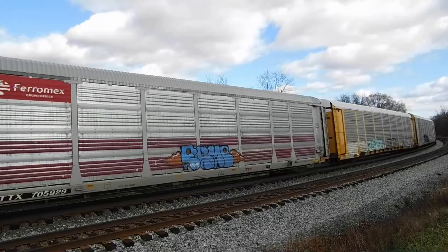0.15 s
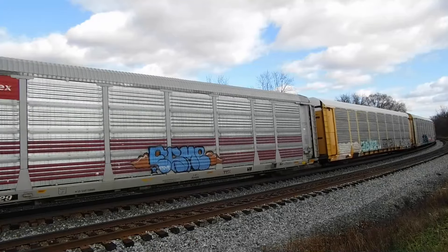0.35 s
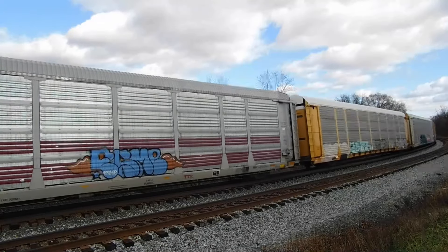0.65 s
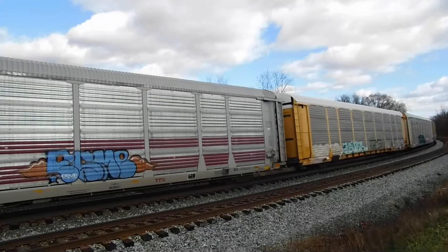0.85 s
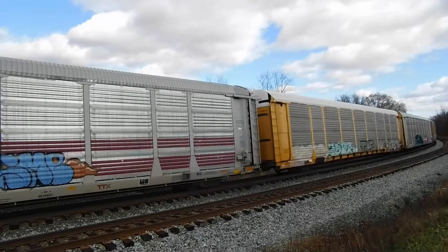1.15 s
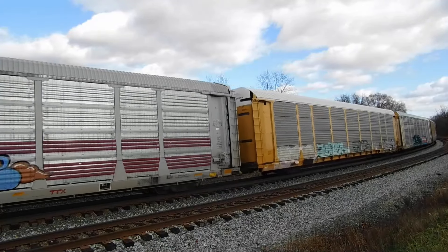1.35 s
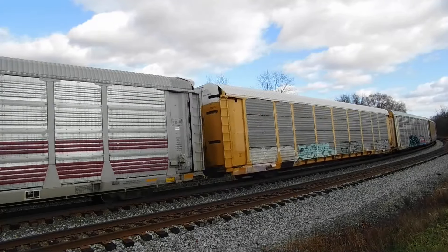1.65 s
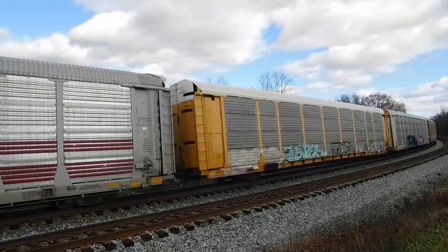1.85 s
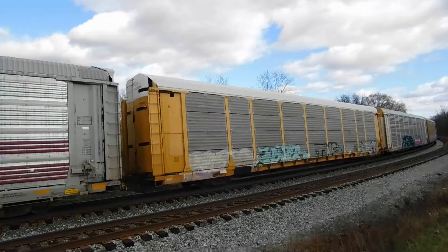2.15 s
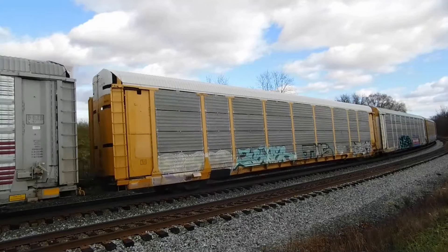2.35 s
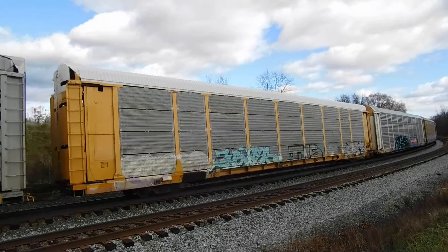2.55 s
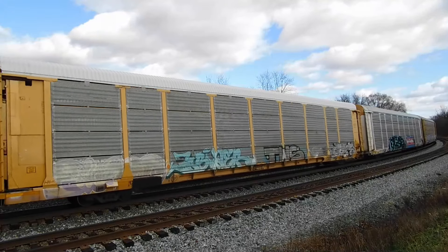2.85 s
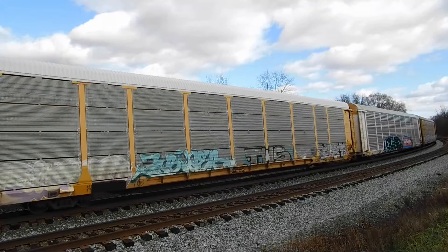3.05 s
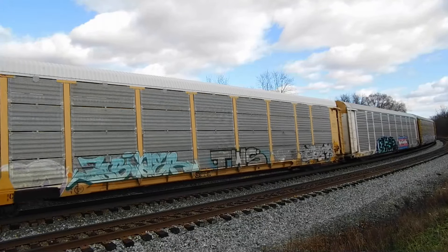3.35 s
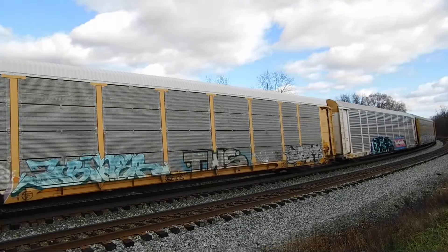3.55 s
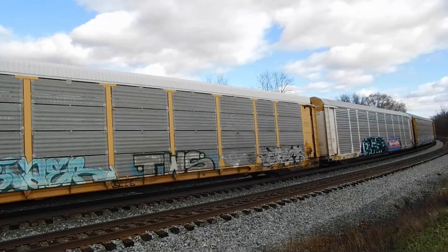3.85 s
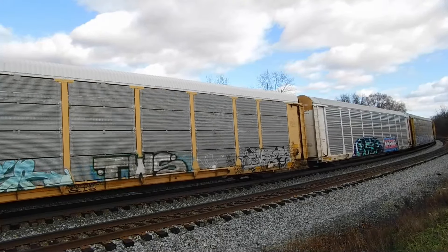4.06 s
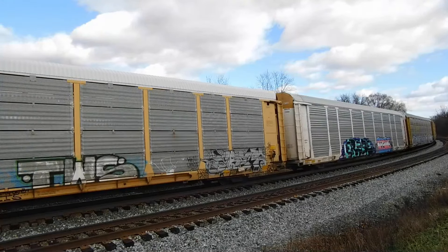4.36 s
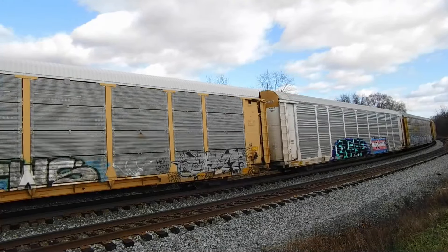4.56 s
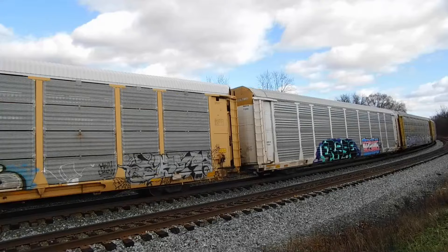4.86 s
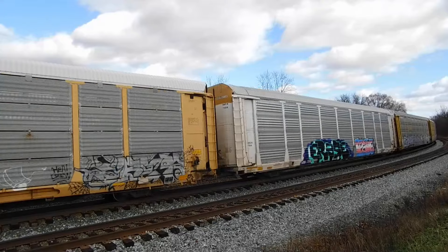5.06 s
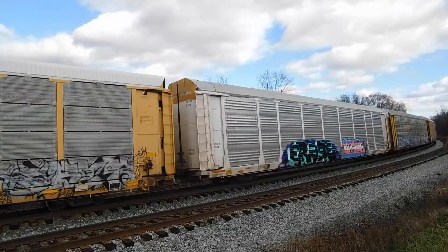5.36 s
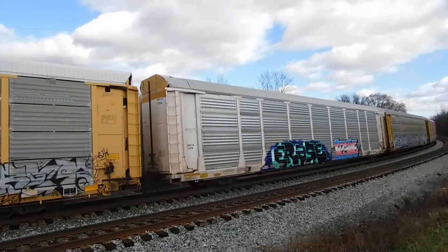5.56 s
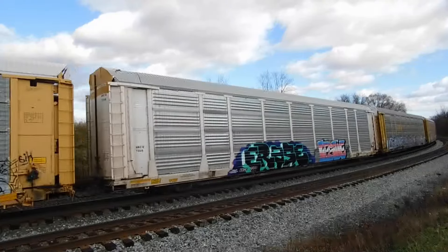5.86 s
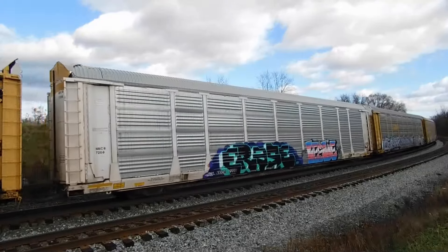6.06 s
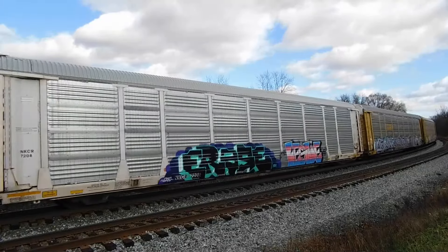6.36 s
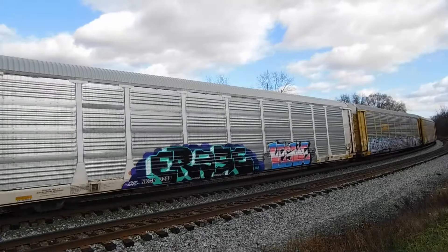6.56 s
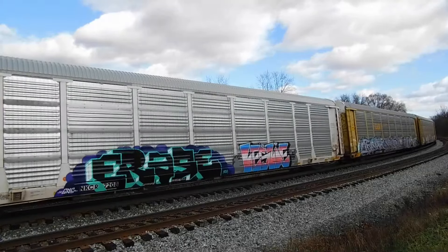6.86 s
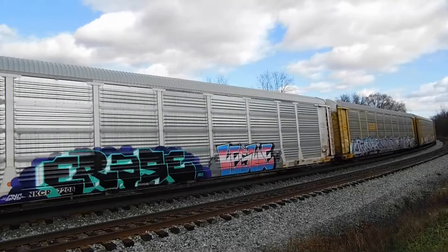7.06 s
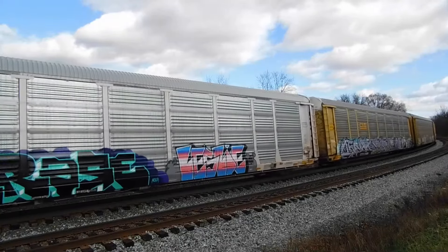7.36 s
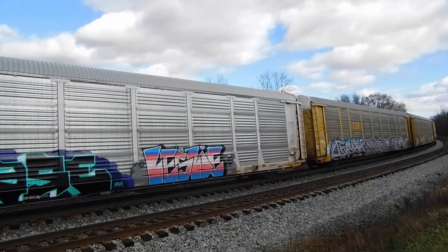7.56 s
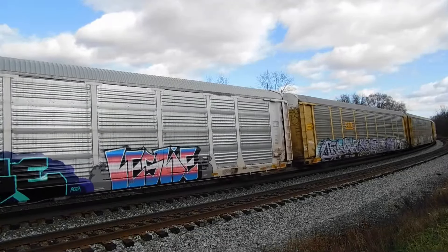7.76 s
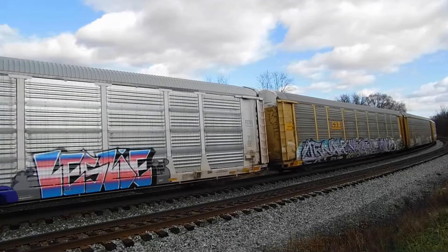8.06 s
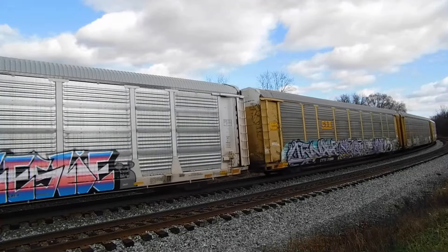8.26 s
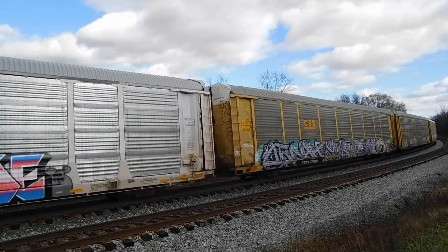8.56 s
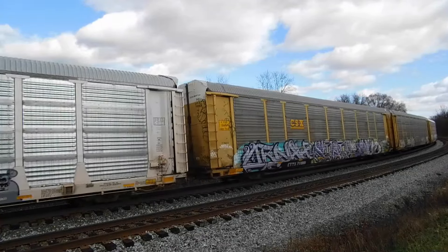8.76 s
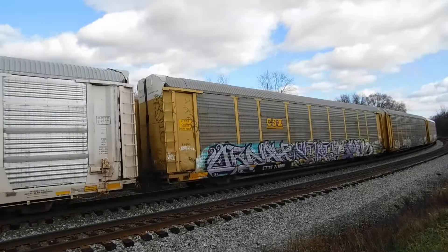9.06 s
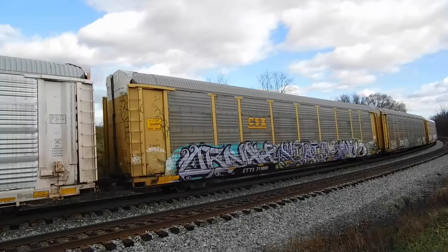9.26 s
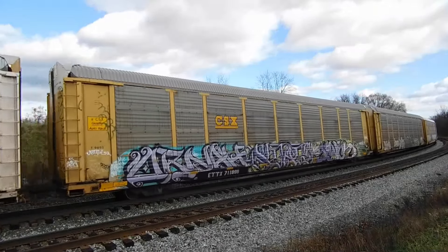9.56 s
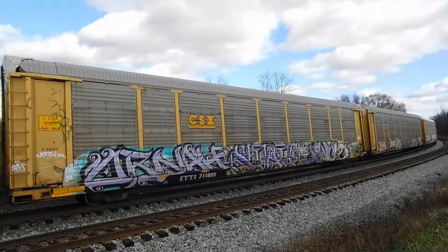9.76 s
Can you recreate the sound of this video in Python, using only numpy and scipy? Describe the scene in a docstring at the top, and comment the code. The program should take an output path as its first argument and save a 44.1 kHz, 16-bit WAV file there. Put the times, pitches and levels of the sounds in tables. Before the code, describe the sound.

A freight train is already passing on a curve outdoors, heard in stereo from about twelve metres. At 0 s a shrill wheel squeal near 2.5 kHz sputters, then grows from 0.5 s into strong, overlapping screeches, fluttering with brief dropouts and echoes. Through about 6 s it dominates, clipping the recorder with harsh buzzing overtones while level control pulls everything down. Its pitch glides slightly lower around 3 s as it passes. Below it, a broad steel roar peaks near 3 s, and low wind gusts buffet from 1 to 4.5 s. Other wheels sing unsteadily, low and mid pitched. Dull clanks knock at 4.2, 4.65 and 5.4 s. Rapid squeal spurts crackle around 6.4-6.7 s as a fainter second squeal enters, fading by about 8 s. Weaker screeches return at 7.4-8.4 and 9-9.6 s with thin scraping, then rolling continues to the 10 s end.

```python
"""Beside a curved railway track, about 12 m off: a freight train of tall car carriers rolls by.
One wheel squeals on a single mode and sinks in pitch as it passes; its sound also scatters off the cars.
Under it: rolling noise, a fainter second squeal, singing wheels, scrapes, clanks and wind.
The sum overloads the recorder: clipping adds harsh overtones, level control turns everything down."""
import sys
import numpy as np
from scipy import signal
from scipy.io import wavfile
from scipy.ndimage import uniform_filter1d

SR = 44100
rng = np.random.default_rng(int(sys.argv[2]) if len(sys.argv) > 2 else 0)


def unload_wav(signal):
    """Save mono or channel-first audio to the path in sys.argv[1] as 16-bit WAV at rate SR, clipped to [-1, 1]."""
    wavfile.write(
        sys.argv[1],
        SR,
        np.round(np.clip(np.atleast_2d(signal).T, -1, 1) * 32767).astype(np.int16),
    )


N = 437022
TIME = np.arange(N) / SR   # s
SIDES = np.array([[1], [-1]])   # left, right


def from_db(db):
    """Decibels to amplitude gain."""
    return 10 ** (np.asarray(db) / 20)


def rms_one(x):
    """Scale to unit power."""
    return x / np.sqrt(np.mean(np.abs(x) ** 2) + 1e-20)


def in_time(rows):
    """Each column of a curve, joined by straight lines."""
    s, *columns = np.transpose(rows)
    return [np.interp(TIME, s, column) for column in columns]


def at_hz(points, hz):
    """Read a spectrum on a log-frequency axis."""
    point_hz, value = np.array(points).T
    return np.interp(np.log(hz), np.log(point_hz), value)


def bump(s, half_s):
    """Bell of height 1 centred on time s, down to 1/e at half_s."""
    return np.exp(-np.minimum(((TIME - s) / half_s) ** 2, 20))


def gate(start_s, end_s, attack_s, release_s):
    """Linear attack, hold, release; half open at start and end."""
    opening = (TIME - start_s) / attack_s
    closing = (end_s - TIME) / release_s
    return np.clip(.5 + np.minimum(opening, closing), 0, 1)


def tone(hz):
    """Complex unit tone following the pitch curve hz."""
    return np.exp(2j * np.pi * np.cumsum(hz) / SR)


def flutter(width_hz, order=2):
    """Complex noise within width_hz of zero, unit power: a random wobble of level and phase."""
    step, run_in = 20, 4000   # made at SR / step, filter start-up dropped
    white = rng.standard_normal((2, N // step + run_in + 2))
    low = signal.butter(order, width_hz, fs=SR / step, output="sos")
    slow = rms_one(signal.sosfilt(low, white[0] + 1j * white[1])[run_in:])
    return np.interp(np.arange(N) / step, np.arange(len(slow)), slow)


def flutter_pair(width_hz):
    """Independent flutter for left and right."""
    return np.array([flutter(width_hz), flutter(width_hz)])


def banded_noise(colour, likeness, patchy_db, patchy_hz, count):
    """Half-octave bands of stereo noise, each with its own level, flicker and likeness; rms 1."""
    edges_hz = 16 * 2 ** (np.arange(count + 1) / 2)
    white = rng.standard_normal((2, 2, N))
    together = flutter(patchy_hz).real   # flicker common to all bands
    out = 0
    for k, (low_hz, high_hz) in enumerate(zip(edges_hz, edges_hz[1:])):
        band = signal.butter(2, [low_hz, high_hz], "band", fs=SR, output="sos")
        mid, side = signal.sosfilt(band, white[k % 2])
        centre_hz = np.sqrt(low_hz * high_hz)
        alike = np.clip(at_hz(likeness, centre_hz), -1, 1)
        flicker_db = patchy_db * (together + flutter(patchy_hz).real)
        gain = from_db(at_hz(colour, centre_hz) + flicker_db)
        out = out + gain * (np.sqrt(1 + alike) * mid + np.sqrt(1 - alike) * side * SIDES)
    return rms_one(out)


def even_hiss(level_db=-57):
    """Faint steady white noise, independent on each side."""
    return from_db(level_db) * rng.standard_normal((2, N))


# wind spectrum: (frequency [Hz], relative density [dB per Hz])
WIND_COLOUR = [(20, -8.5), (45, 3), (80, -4.5), (150, -6), (300, -16.5), (800, -61), (3000, -86)]
# gusts: (peak time [s], half length [s], level [dB])
GUSTS = [(0.098, 0.27, -41), (0.67, 0.14, -33.5), (1.325, 0.4, -23), (2.223, 0.24, -19.5),
         (3.125, 0.75, -21.5), (3.418, 0.096, -19), (3.757, 0.13, -22.5), (4.53, 0.41, -26.5),
         (5.7, 0.71, -31)]


def wind(breeze_db=-61, left_db=2.5):
    """Lumpy eddies at the microphone ports, partly separate on each side; gusts ride on a light breeze."""
    likeness = [(20, 0.59), (300, 0.05)]   # (frequency [Hz], left-right likeness [-1 to 1])
    eddies = banded_noise(WIND_COLOUR, likeness, patchy_db=1.0, patchy_hz=21, count=12)
    gusts = sum(from_db(db) * bump(s, half_s) for s, half_s, db in GUSTS)
    return (from_db(breeze_db) + gusts) * eddies * from_db(left_db * SIDES)


# all wheels rolling on the rails, before trim: (time [s], level [dB])
ROLLING = [(0, -29.5), (1.8, -23), (2.7, -21.5), (3, -18), (3.7, -20.5), (4.3, -21.5), (5.7, -24.5),
           (7, -26), (8.1, -28), (8.5, -24.5), (9.9, -23)]
# rolling spectrum: (frequency [Hz], relative density [dB per Hz])
ROLLING_COLOUR = [(30, -13.5), (60, -9), (150, -10), (220, -11), (440, -2.5), (700, -0.5), (1100, -5.5),
                  (1550, -2.5), (2200, -13), (3400, -15.5), (5200, -28.5), (9000, -27), (11500, -59),
                  (15500, -36)]
# left-right likeness of rolling: (frequency [Hz], likeness [-1 to 1])
ROLLING_LIKENESS = [(60, 1), (290, 0.99), (640, 0.87), (1410, 0.45), (3100, -0.57), (6800, -0.084),
                    (15000, -0.69)]


def rolling(trim_db=-0.5, left_db=0.55):
    """Rough steel on steel: a broad, slightly uneven roar."""
    roar = banded_noise(ROLLING_COLOUR, ROLLING_LIKENESS, patchy_db=1.26, patchy_hz=17.0, count=20)
    return from_db(in_time(ROLLING)[0] + trim_db) * roar * from_db(left_db * SIDES)


# flanges scraping the rail: (start [s], end [s], low edge [Hz], high edge [Hz], level [dB])
SCRAPES = [(0.265, 0.295, 3300, 4700, -38), (8.296, 9.07, 2830, 4600, -42), (8.85, 8.89, 5000, 13000, -50),
           (9.37, 9.456, 6000, 14000, -48), (9.64, 9.727, 8500, 9800, -50)]


def scraping_flanges(fade_share=0.32):
    """Steel rubs without ringing: a band of hiss that swells and fades."""
    out = np.zeros((2, N))
    for start_s, end_s, low_hz, high_hz, db in SCRAPES:
        top_hz = np.clip(high_hz, 1.05 * low_hz, .45 * SR)
        band = signal.butter(2, [low_hz, top_hz], "band", fs=SR, output="sos")
        hiss = rms_one(signal.sosfilt(band, rng.standard_normal((2, N))))
        fade_s = fade_share * (end_s - start_s)
        out += from_db(db) * gate(start_s, end_s, fade_s, fade_s) * hiss
    return out


# thin tones that ring unsteadily, mostly other wheels singing as their flanges rub; the 1442 Hz row at 4.1-5.1
# s is a thin tone near 1.44 kHz under the squeal: (start [s], end [s], frequency [Hz], level [dB])
SINGING = [(-.1, 0.538, 1517, -36.5), (0.597, 0.987, 1486, -34.5), (1.59, 2.157, 612, -33.5),
           (2.59, 2.893, 1507, -34), (3.583, 4.015, 603.3, -24), (4.125, 5.103, 1442, -34),
           (4.2, 4.984, 607.5, -32), (6.18, 6.26, 6960, -30), (6.497, 8.106, 1488, -43),
           (8.598, 10.0, 1515, -40.5)]


def singing_wheels(fade_s=0.034, width_hz=20, unsteady=0.61):
    """Thin tones that ring unsteadily, mostly rubbed wheel modes that do not lock into a squeal."""
    out = np.zeros(N)
    for start_s, end_s, hz, db in SINGING:
        swell = 1 + unsteady * flutter(width_hz)
        pitch_hz = hz + width_hz / 2 * flutter(width_hz).real
        mode = rms_one((swell * tone(pitch_hz)).real)
        out += from_db(db) * gate(start_s, end_s, fade_s, fade_s) * mode
    return out


# couplers and running gear: (time [s], level [dB], 60 dB decay [s], upper band edge [Hz])
CLANKS = [(4.225, -22, 0.26, 700), (4.279, -19.5, 0.33, 910), (4.65, -23, 0.26, 900),
          (5.408, -16, 0.34, 1880), (5.438, -20.5, 0.71, 1360)]


def clanks(low_hz=400):
    """A knock sets the crowded modes of a car body ringing: decaying band noise."""
    out = np.zeros((2, N))
    for s, db, t60_s, bright_hz in CLANKS:
        top_hz = np.clip(bright_hz, 2 * low_hz, SR / 3)
        band = signal.butter(2, [low_hz, top_hz], "band", fs=SR, output="sos")
        knock = (TIME >= s) * from_db(-60 * np.clip((TIME - s) / t60_s, 0, 2))
        white = rng.standard_normal(N) + .5 * rng.standard_normal((2, N))   # shared + separate
        out += from_db(db) * knock * rms_one(signal.sosfilt(band, white))
    return out


# faint second squeal: (start [s], end [s], fundamental [Hz])
SECOND_WHEEL = (6.4, 7.5, 2480)
# its harmonics, lowest first: level [dB]
SECOND_WHEEL_DB = [-24.5, -42, -47.5, -58, -54, -61]


def second_wheel(attack_s=0.22, release_s=1.2, waver_hz=12, width_hz=90):
    """Another wheel squeals faintly, with thin, wavering overtones, and dies away."""
    start_s, end_s, hz = SECOND_WHEEL
    fundamental = tone(hz + waver_hz * flutter(waver_hz).real)
    harmonics = 0
    for k, db in enumerate(SECOND_WHEEL_DB, 1):
        harmonics = harmonics + from_db(db) * flutter_pair(width_hz) * fundamental ** k
    return gate(start_s, end_s, attack_s, release_s) * harmonics.real


WHEEL_HZ = 2486   # squeal pitch without Doppler


def passing_wheel(speed_m_s=8.3, nearest_s=3.2, nearest_m=12.0):
    """Steady pass in a straight line: Doppler pitch [Hz] and 1/distance gain, 1 at the nearest point."""
    along_m = speed_m_s * (TIME - nearest_s)
    distance_m = np.hypot(along_m, nearest_m)
    pitch_hz = WHEEL_HZ / (1 + speed_m_s / 343 * along_m / distance_m)   # sound at 343 m/s
    return pitch_hz, nearest_m / distance_m


# the flange bites and the ring swells: (start [s], end [s], level [dB])
BITES = [(-.1, 0.504, -7), (0.523, 1.095, 5), (1.044, 1.52, 10), (1.565, 1.733, 4), (1.727, 2.02, -2.5),
         (2.024, 2.27, 6.5), (2.303, 2.625, 8), (2.594, 2.783, -8), (2.795, 3.375, 5.5), (3.35, 3.648, 2.5),
         (3.74, 4.096, 3.5), (4.1, 4.306, 0.5), (4.44, 4.6, 3), (4.832, 4.927, 4), (4.985, 5.376, 1.5),
         (5.33, 5.552, -4), (5.693, 5.835, 2), (5.893, 6.41, 0), (7.37, 8.12, -3), (8.13, 8.415, -7.5),
         (9.03, 9.61, -6)]
# short spurts of ring; the last is a brief crackle as the recorder overloads: (time [s], level [dB])
SPURTS = [(0.033, -5), (.076, -6.5), (0.113, -10), (0.145, -1.5), (.256, -25), (0.484, -15), (6.436, -8),
          (6.51, -1.5), (6.584, 4), (6.664, -0.5), (6.725, 2), (7.62, -4)]


def wheel_ring(idle_db=-12, attack_s=0.17, release_s=0.28, spurt_half_s=0.011):
    """Mode amplitude: idles, builds at each bite of the flange and dies back; short spurts are added."""
    ring = from_db(idle_db)
    for start_s, end_s, db in BITES:
        ring = np.hypot(ring, from_db(db) * gate(start_s, end_s, attack_s, release_s))
    return ring + sum(from_db(db) * bump(s, spurt_half_s) for s, db in SPURTS)


# how hard the curve presses wheel on rail: (time [s], level [dB])
PRESSURE = [(0, -1.5), (.8, 2.5), (1.8, 5), (3.4, 6), (5.4, 7.5), (6.3, 5), (6.75, -2.5), (8.2, -0.5),
            (9.5, -3.5), (9.78, -12)]
# sound scattered by the cars: (time [s], level [dB])
SCATTER = [(0, -3.5), (1, 1), (1.25, 3), (1.5, 2), (2.2, 3), (2.45, -5.5), (2.65, 2), (2.9, 0), (3.25, 2),
           (3.5, 2.5), (4, 0.5), (5, -2.5), (6, -3), (6.9, 1), (7.6, -7), (8, -6.5), (9.9, -2.5)]
# direct and reflected paths interfere, mostly cancelling: (time [s], left gain [dB], right gain [dB])
DROPOUTS = [(0.057, -32.5, -20.5), (0.24, -30, -22), (0.471, -8, -22), (0.633, -39, -12), (0.744, 3, -22),
            (0.803, -19, -4), (1.417, -21, -8), (1.589, -20, -6), (1.704, -19, -8), (1.847, -13, -12),
            (2.647, -20, -23), (2.745, 1, -23), (2.788, -30, -5), (3.114, -33, -32), (3.384, -10, -28),
            (3.629, -27, -17), (4.045, -10, -5), (5.012, -38, -10), (5.859, -1, -2), (6.399, -21, -16),
            (6.42, -19, -3)]
# squeal direction: (time [s], left over right [dB], lead of left [ms])
BEARING = [(0, -3.5, -0.1), (1, 0, -0.081), (2, 4, -0.054), (2.7, 4, 0.046), (3.4, 3, 0.12), (4.1, 4, 0.18),
           (4.9, 5.5, 0.18), (5.1, 8.5, 0.15), (5.5, 6.5, 0.19), (5.75, 5, 0.15), (6.5, 6.5, .18),
           (6.9, 3.5, .15), (7.6, 4, 0.12), (8.3, 5, 0.14), (8.8, 4.5, 0.13), (9.9, -1, 0.14)]
# octave against main tone: (time [s], level [dB])
OCTAVE = [(0, -15), (.5, -28.5), (2.5, -29), (3.3, -20.5), (4.2, -41), (9.9, -66)]


def squeal(spread_db=-6.5, spread_hz=62, far_db=-11, far_hz=30, far_share=0.6,
           near_db=-11, near_hz=25, rasp_db=-16, rasp_hz=105, apart_db=-12, apart_hz=50,
           dropout_half_s=0.0048, octave_waver=0.6, octave_hz=45,
           second_db=-33.0, third_db=-48, fifth_db=-50):
    """Stick-slip keeps one wheel mode ringing; distance sets its level, motion its pitch and echo smear."""
    pitch_hz, nearness = passing_wheel()
    pressure_db, = in_time(PRESSURE)
    pan_db, lead_ms = in_time(BEARING)
    ring, scatter = wheel_ring(), from_db(in_time(SCATTER)[0])
    direct = tone(pitch_hz)
    # echoes along the train: every Doppler shift between approach and retreat
    spread = from_db(spread_db) * flutter(spread_hz, order=10) * np.exp(2j * np.pi * WHEEL_HZ * TIME)
    # far-side echo: opposite shift, beats fast against the direct tone
    far_pitch_hz = WHEEL_HZ - far_share * (pitch_hz - WHEEL_HZ)
    far = from_db(far_db) * flutter(far_hz, order=4) * tone(far_pitch_hz)
    # sidebands: nearby echoes and uneven rail grip
    near = from_db(near_db) * flutter(near_hz)
    rasp = from_db(rasp_db) * flutter(rasp_hz, order=3)
    # echoes that differ at the two microphones
    apart = from_db(apart_db) * flutter_pair(apart_hz)
    wave = ring * direct + scatter * (spread + far + (near + rasp + apart) * direct)

    dips_db = 0
    for s, left_db, right_db in DROPOUTS:
        dips_db = dips_db + np.array([[left_db], [right_db]]) * bump(s, dropout_half_s)
    # arrival lead as phase, half on each side
    lead = np.exp(1j * np.pi * pitch_hz * lead_ms / 1000 * SIDES)
    wave = wave * nearness * from_db(pressure_db + dips_db) * lead

    # lopsided slip: a thin octave that wavers on its own, without the dips
    steady = np.hypot(ring, scatter) * nearness * from_db(pressure_db)
    waver = 1j + octave_waver * flutter(octave_hz)
    octave = from_db(in_time(OCTAVE)[0]) * steady * (direct * lead) ** 2 * waver
    # faint overtones that also ride on the echoes
    turn = wave / (np.abs(wave) + 1e-9)
    second = from_db(second_db) * 1j * wave * turn
    third = from_db(third_db) * -wave * turn ** 2
    fifth = from_db(fifth_db) * wave * turn ** 4
    return (wave + octave + second + third + fifth).real * from_db(pan_db / 2 * SIDES)


def scene():
    """All sources summed, background first."""
    background = even_hiss() + wind() + rolling()
    details = scraping_flanges() + singing_wheels() + clanks()
    return background + details + second_wheel() + squeal()


def smooth(x, time_s):
    """One-pole average with time constant time_s."""
    r = np.exp(-1 / (time_s * SR))
    return signal.lfilter([1 - r], [1, -r], x)


def gain_control(x, threshold_db=-11, slope=0.53, follow_s=0.33):
    """The recorder slowly turns both sides down while loud, by slope dB per dB over threshold."""
    level_db = 10 * np.log10(smooth(np.mean(x ** 2, axis=0), follow_s) + 1e-9)
    return x * from_db(-slope * np.maximum(level_db - threshold_db, 0))


FULL_SCALE = 0.435   # converter clip level, amplitude
CONVERTER_HZ = 48000   # sampling rate


def first_order(x, hz, kind="low"):
    """Gentle first-order filter."""
    return signal.lfilter(*signal.butter(1, hz, kind, fs=SR), x)


def overload_noise(x, hiss_db=-34, hiss_hz=5000, rumble_db=-38, rumble_hz=800):
    """Bright hiss and dull rumble that swell steeply near full scale, then level off."""
    hold_s, steepness, knee = 0.004, 8, 0.4
    drive = smooth(np.minimum(np.abs(x) / FULL_SCALE, 2) ** steepness + 1e-9, hold_s)
    white, dull = rng.standard_normal((2, 2, N))
    hiss = from_db(hiss_db) * rms_one(first_order(white, hiss_hz, "high"))
    rumble = from_db(rumble_db) * rms_one(first_order(dull, rumble_hz))
    return drive / (drive + knee) * (hiss + rumble)


# folded overtones at the reference overload: (multiple of wheel pitch, level [dB])
FOLDED = [(13, -42), (15, -41.5), (17, -44), (19, -38.5)]


def folded_overtones(x, width_hz=60, hold_s=0.018, deep_share=0.63):
    """High odd overtones fold round the converter's rate: rough tones that glide as the squeal sinks."""
    pitch_hz, _ = passing_wheel()
    over = (np.abs(x) > FULL_SCALE).astype(float)
    over_share = uniform_filter1d(over, max(int(hold_s * SR), 1), axis=1)
    tones = 0
    for multiple, db in FOLDED:
        # most rise; the lowest falls to zero, then rises
        folded = tone(CONVERTER_HZ - round(multiple) * pitch_hz)
        tones = tones + from_db(db) * flutter_pair(width_hz) * folded
    return (over_share / deep_share) ** 2 * tones.real   # table level where over_share = deep_share


def record(dry, presence=0.0044, presence_hz=5500, low_hz=12, cutoff_hz=15800):
    """Level control, hard clipping with its noise and folded tones, a trace of treble lift, both ends cut."""
    levelled = gain_control(dry)
    fast = signal.resample_poly(levelled, CONVERTER_HZ, SR, axis=1)
    flattened = np.clip(fast, -FULL_SCALE, FULL_SCALE)
    clipped = signal.resample_poly(flattened, SR, CONVERTER_HZ, axis=1)[:, :N]
    harsh = clipped + overload_noise(levelled) + folded_overtones(levelled)
    bright = harsh + presence * first_order(harsh, presence_hz, "high")
    centred = first_order(bright, low_hz, "high")
    treble_cut = signal.ellip(12, .1, 90, cutoff_hz, fs=SR, output="sos")
    return signal.sosfilt(treble_cut, centred)


dry = scene()
out = record(dry)
unload_wav(out)
```